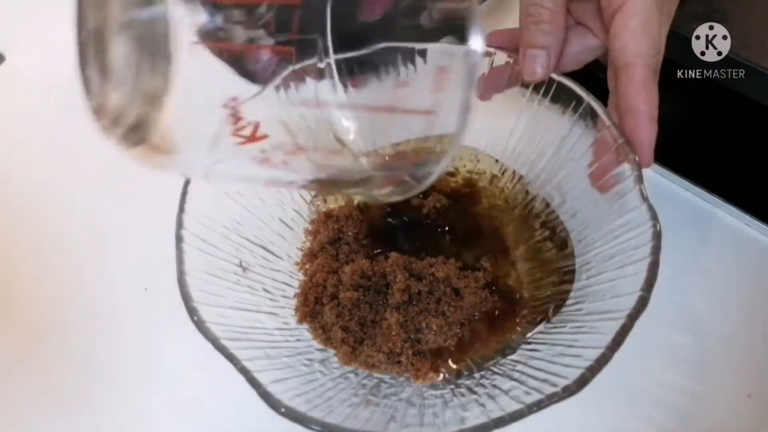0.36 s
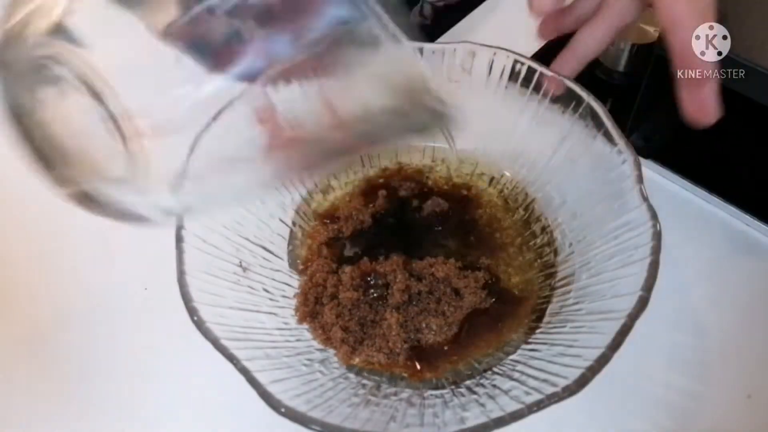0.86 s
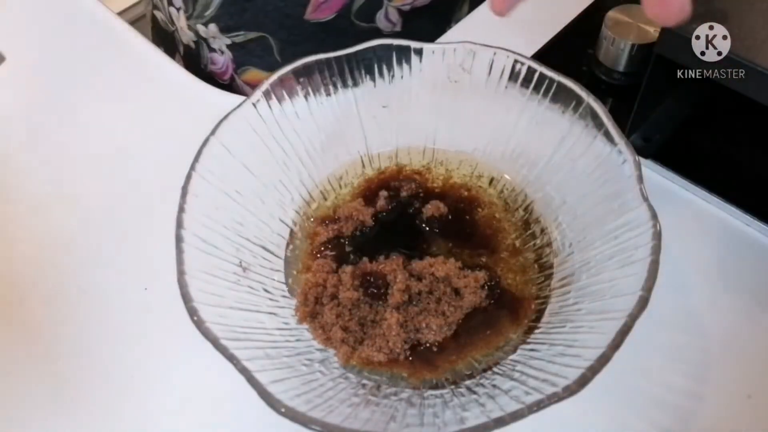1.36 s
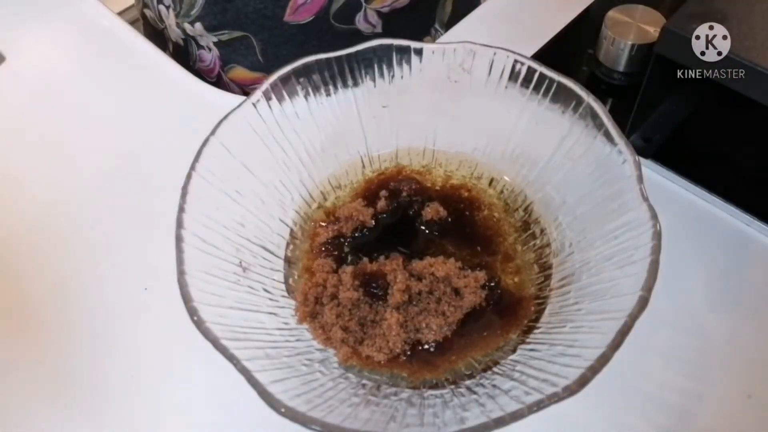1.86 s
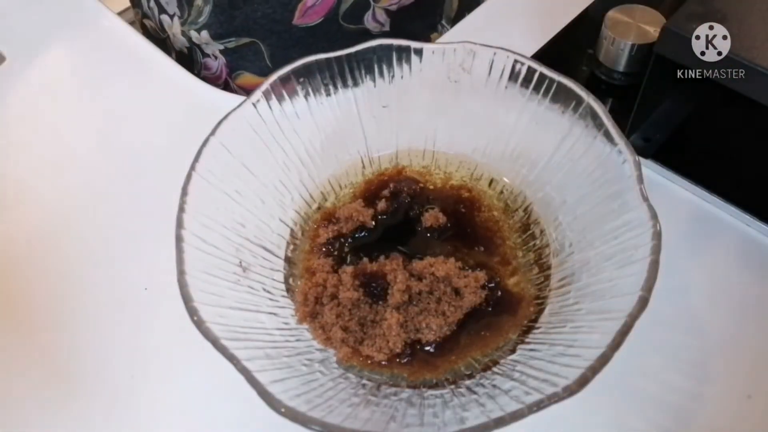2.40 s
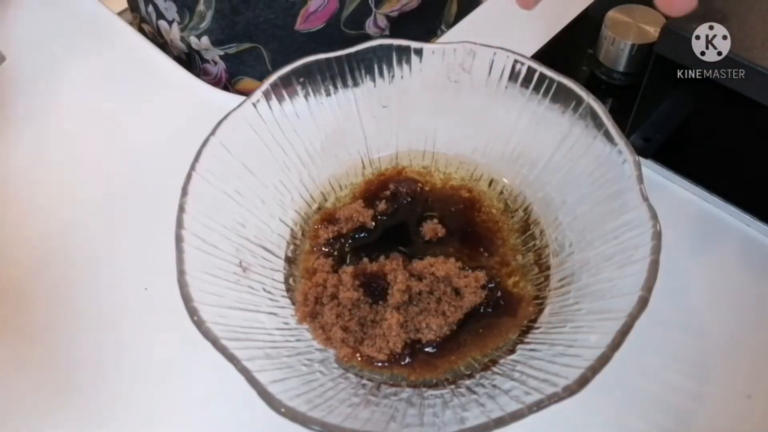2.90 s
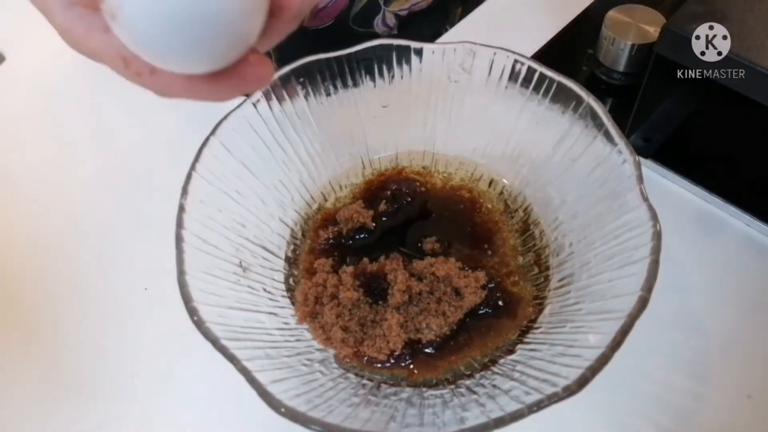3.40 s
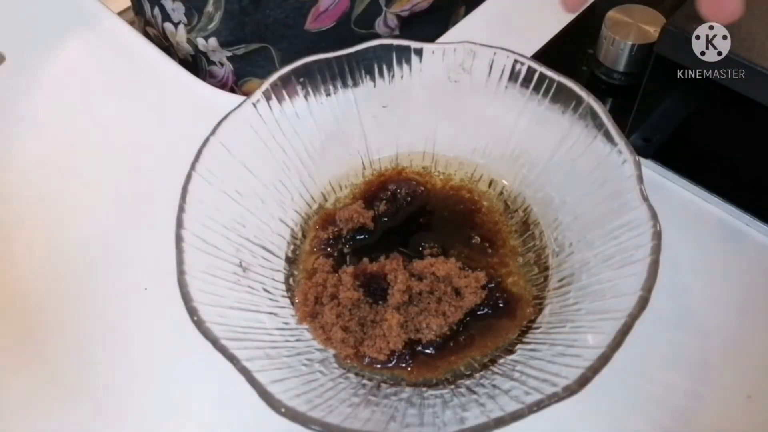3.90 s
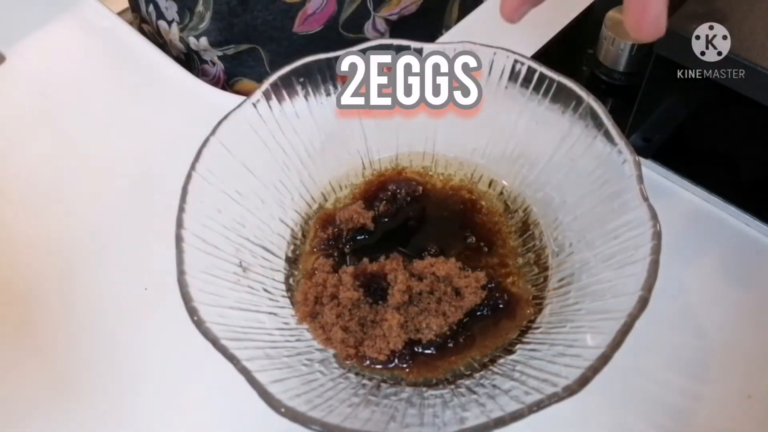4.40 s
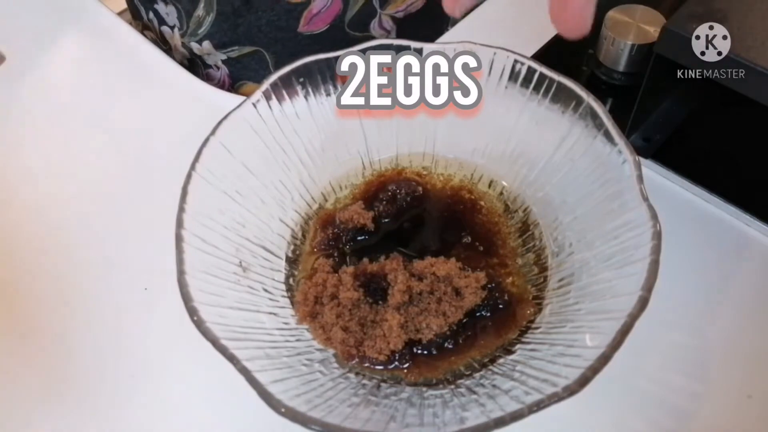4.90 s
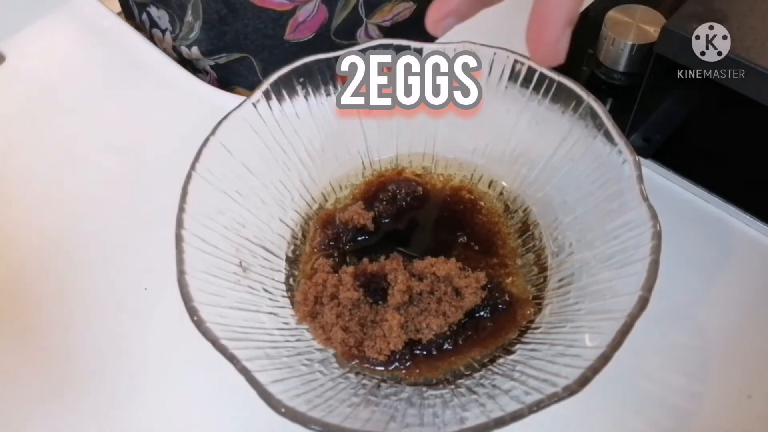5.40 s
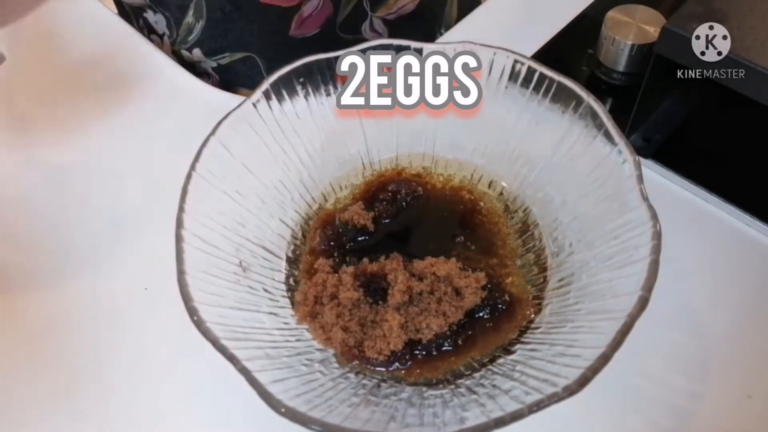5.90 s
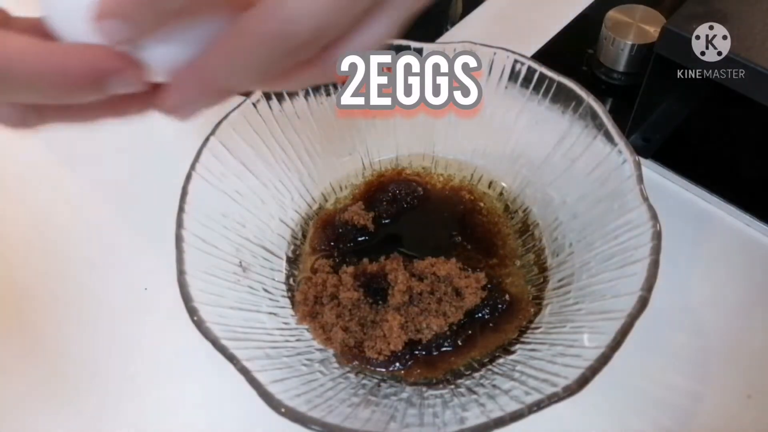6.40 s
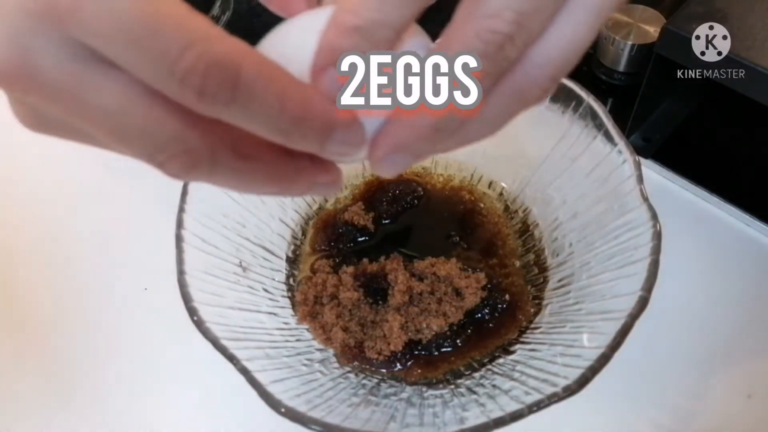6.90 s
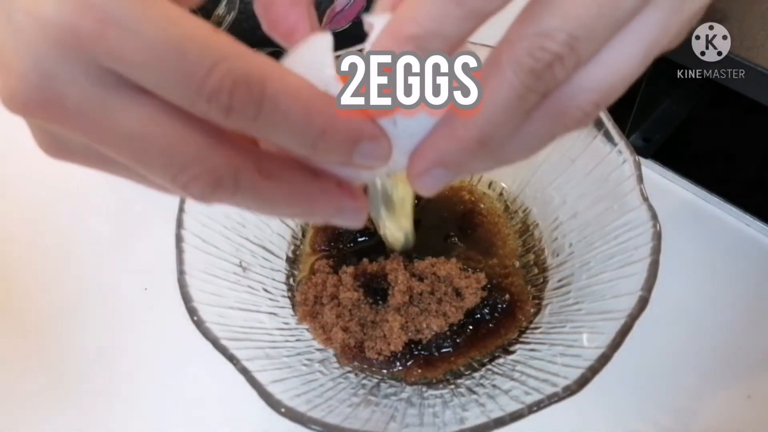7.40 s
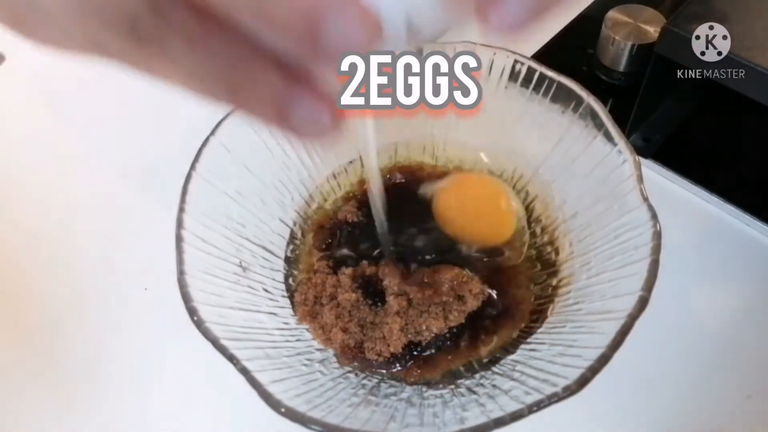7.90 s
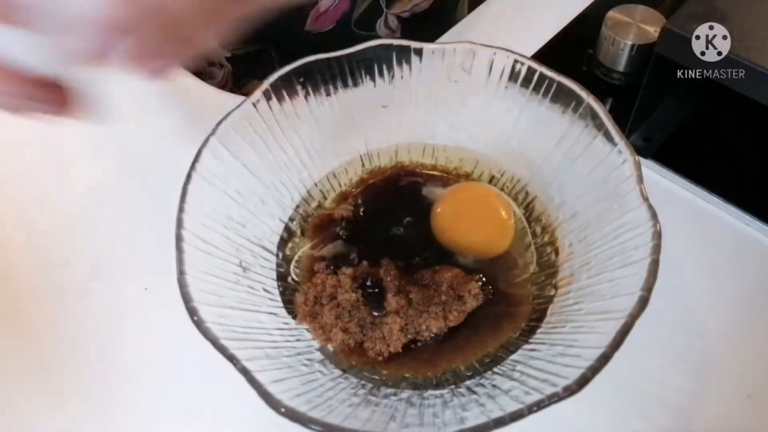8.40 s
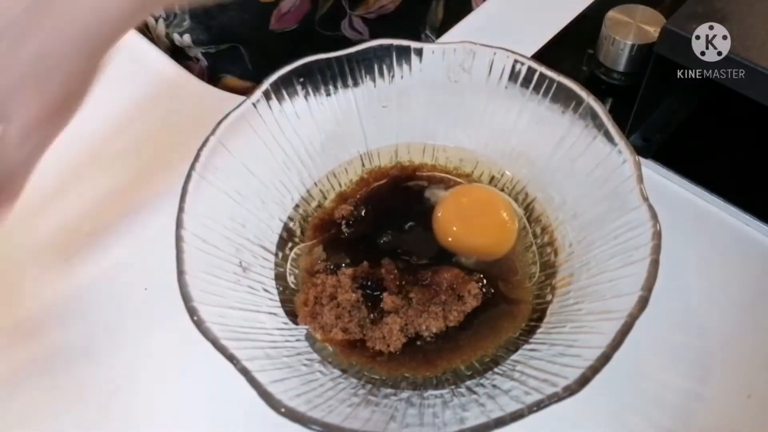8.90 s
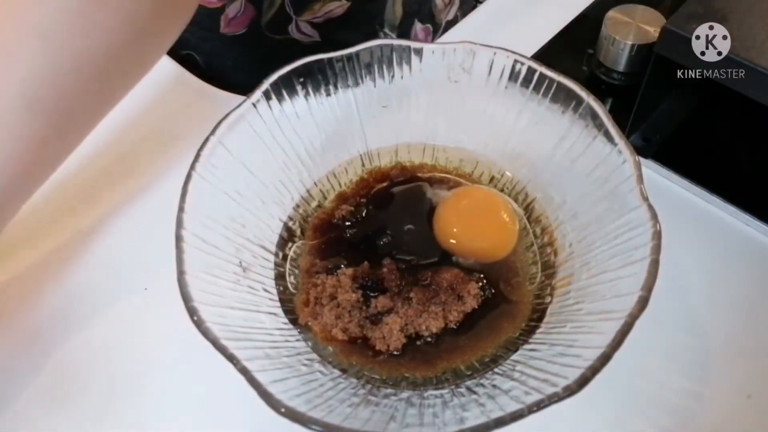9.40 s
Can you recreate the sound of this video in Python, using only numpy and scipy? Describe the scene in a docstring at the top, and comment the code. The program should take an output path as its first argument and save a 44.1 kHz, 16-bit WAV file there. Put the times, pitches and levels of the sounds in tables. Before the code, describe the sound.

A heavy jug thuds onto a counter over a low appliance hum, then an egg is tapped, crackles open, and glassware clinks sharply.

```python
"""Egg and glassware in a quiet kitchen

Heard close, through a small two-port microphone: a wavering appliance hum and fan hiss, made of shaped noise and tones.
A heavy jug is set on the counter, something knocks on wood, an egg is tapped, its shell crackles open, the halves
click together and small glassware clinks. Each blow is a noise burst plus decaying modes; fingers rub in tiny slips.
The hard room answers every blow with a short tail of noise."""
import sys
import numpy as np
from scipy import signal
from scipy.fft import irfft
from scipy.io import wavfile
from scipy.ndimage import uniform_filter1d

SR = 44100
rng = np.random.default_rng(int(sys.argv[2]) if len(sys.argv) > 2 else 0)


def output_pcm(signal):
    """Save a mono or channel-first signal as 16-bit PCM at the path in sys.argv[1].

    Samples are clipped to [-1, 1] before scaling.
    """
    pcm = np.clip(np.atleast_2d(signal).T, -1, 1) * 32767
    wavfile.write(sys.argv[1], SR, np.round(pcm).astype(np.int16))


def amplitude_ratio(level_db):
    """Convert a level in decibels to the matching linear amplitude (field) ratio."""
    exponent = np.asarray(level_db, float) / 20
    return 10 ** exponent


N = 420273  # length in samples

# Likeness of left and right port. Each row: frequency in Hz, correlation from -1 to 1.
LIKENESS = [(60, 0.87), (180, 0.91), (550, 0.94), (1650, -0.14), (4970, 0.12), (15000, -0.26)]
# Ringing of the egg shell halves. Each row: frequency in Hz, level in dB, t60 in seconds.
SHELL_MODES = [(1566, 6.5, 0.027), (1980, 0.5, 0.052), (2240, -2.5, 0.044), (2860, -4, 0.049),
               (4200, -7.5, 0.1), (5200, -7, 0.074), (5690, -5.5, 0.093), (10600, -9, 0.032)]


def evened(x):
    """Scales to rms 1."""
    return x / np.sqrt(np.mean(abs(x) ** 2) + 1e-20)


def read(points, hz):
    """Reads a spectrum table on a log-frequency axis."""
    f, value = np.transpose(points)
    return np.interp(np.log(hz + 1), np.log(f + 1), value)


def add(mix, s, sound):
    """Mixes a sound in at s seconds."""
    part = mix[round(s * SR):][:len(sound)]
    part += sound[:len(part)]


def pair(magnitude, size):
    """Two-channel noise from a bins x frames magnitude, with the tabled likeness between ports."""
    a, b, c, d = rng.standard_normal((4, *magnitude.shape))
    same = np.clip(read(LIKENESS, np.fft.rfftfreq(size, 1 / SR)), -1, 1)[:, None]
    left = a + 1j * b
    right = same * left + np.sqrt(1 - same ** 2) * (c + 1j * d)
    z = np.array([left, right])
    return signal.istft(z * magnitude, nperseg=size, noverlap=size * 3 // 4)[1]


def background(patchy_db=1.61, deep_hz=125, split_hz=1500):
    """Fan rumble and hiss, hum lines that wander like narrow noise, and mains tones of fixed pitch."""
    # Colour of the air noise. Each row: frequency in Hz, density in dB per Hz.
    air = [(15, -6.5), (35, -14.5), (68, -22), (120, -9.5), (260, -10), (334, -14.5), (479, -10),
           (521, -17.5), (935, -17), (1590, -29), (3100, -25), (4100, -33.5), (5560, -25.5), (7770, -39),
           (15600, -46)]
    air_level_db = -55.5
    # Humps in the hiss. Each row: centre in Hz, width in Hz, height in dB.
    hiss_humps = [(3240, 1670, 4.5), (5460, 890, 5.5), (3800, 290, -3)]
    # Wandering hum lines. Each row: centre in Hz, width in Hz, level in dB.
    hum_lines = [(49.2, 17, -63), (100.1, 6.5, -63), (151.6, 9.8, -64.5), (269.2, 8, -67), (312, 12, -76),
                 (474.7, 9, -70.5), (665, 16, -73), (866, 4.7, -76)]
    # Steady part of the hum. Each row: frequency in Hz, rms in dB.
    mains_tones = [(50, -62.5), (100, -60.5), (150, -68.5)]
    # Level steps down at the first egg tap, dips at the loud clink, then swells back.
    # Each row: time in seconds, level in dB.
    level_points = [(0, 0), (4.43, 0), (4.52, -10), (8.93, -10), (8.95, -22), (9.08, -17), (9.2, -11.5),
                    (9.36, -4.5), (9.53, -1)]
    # How fully each band follows that level: shares for the hiss, the rumble and the deep hum.
    follow = (.95, 1.033, 0.84)
    size = 4096
    hz, t = np.fft.rfftfreq(size, 1 / SR), np.arange(N) / SR
    frames = N * 4 // size + 5

    air_db = read(air, hz)
    for f, w, db in hiss_humps:
        air_db = air_db + db * np.exp(-((hz - f) / w) ** 2)
    power = amplitude_ratio(2 * air_db) / amplitude_ratio(2 * air_db).sum() * amplitude_ratio(2 * air_level_db)
    for f, w, db in hum_lines:
        line = np.exp(-((hz - f) / w) ** 2)
        power = power + amplitude_ratio(2 * db) * line / line.sum()

    # slow patches of louder and softer noise over time and frequency
    patches = uniform_filter1d(rng.standard_normal((frames, len(hz))), size=4, axis=0)
    patches = evened(uniform_filter1d(patches, size=30, axis=1))
    noise = pair(np.sqrt(power)[:, None] * amplitude_ratio(patchy_db * patches.T), size)[:, :N]
    noise *= np.sqrt(power.sum() / np.mean(noise ** 2))
    for f, db in mains_tones:
        noise += amplitude_ratio(db) * np.sqrt(2) * np.sin(2 * np.pi * (f * t + rng.random()))

    deep = signal.sosfiltfilt(signal.butter(2, deep_hz, fs=SR, output="sos"), noise)
    low = signal.sosfiltfilt(signal.butter(2, split_hz, fs=SR, output="sos"), noise)
    level_db = np.interp(t, *np.transpose(level_points))
    bands = (noise - low, low - deep, deep)
    return sum(band * amplitude_ratio(share * level_db) for band, share in zip(bands, follow))


def coloured(x, colour, tilt_db=0, cut_hz=1, cut_db=0):
    """Causal minimum-phase filter with the given spectrum, tilted about 1 kHz and weighted by cut_db below cut_hz."""
    hz = np.fft.rfftfreq(4096, 1 / SR) + 10
    shape_db = read(colour, hz) + tilt_db * np.log2(hz / 1000)
    shape_db -= cut_db * np.maximum(np.log2(cut_hz / hz), 0) ** 2
    log_gain = np.log(amplitude_ratio(np.maximum(shape_db, -90)))
    full = np.r_[log_gain, log_gain[-2:0:-1]]
    taps = np.fft.ifft(np.exp(np.conj(signal.hilbert(full)))).real[:2048]
    return signal.oaconvolve(x, taps / np.linalg.norm(taps))


def wander(shape, hz):
    """Slow complex chance of rms 1, up to about hz."""
    z = rng.standard_normal(shape) + 1j * rng.standard_normal(shape)
    r = np.exp(-2 * np.pi * hz / SR)
    once = signal.lfilter([1 - r], [1, -r], z)
    return evened(signal.lfilter([1 - r], [1, -r], once))


def blows(rows, modes, colour, tilt_db, dull_db, rise_ms, wet_db, focus_db, cut_db, rough, rough_hz):
    """Each blow is a burst of breaking noise and the ringing of what was struck.
    The crack tilts by tilt_db an octave, less dull_db for each ms of contact.
    Returns the crack, the same crack as one smooth pulse for the walls, and the left and right ring."""
    swell_cycles = 0.64  # a mode needs about this many cycles more to build up
    out, t = np.zeros((4, N)), np.arange(SR // 2) / SR
    crack, pulse, *sides = out
    crack_t_ms = t[:2048] * 1000
    hz, db, t60 = np.transpose(modes)[:, :, None]
    same = np.clip(read(LIKENESS, hz), 0, 1)
    for s, crack_db, ms, ring_db, spot_hz in rows:
        slope_db = tilt_db - dull_db * ms
        fade = amplitude_ratio(crack_db) * np.exp(-crack_t_ms / max(ms, .1))
        fade *= 1 - np.exp(-crack_t_ms / (0.6 * rise_ms))
        burst = fade * rng.standard_normal(2048)
        add(crack, s, coloured(burst, colour, slope_db, spot_hz, cut_db))
        click = amplitude_ratio(wet_db) * np.linalg.norm(fade, keepdims=True)  # one sample
        add(pulse, s, coloured(click, colour, slope_db, spot_hz, cut_db))

        # the spot struck weights each mode by its distance in octaves
        size = amplitude_ratio(ring_db + db - focus_db * np.log2(hz / spot_hz) ** 2 - 60 * t / t60)
        size *= 1 - np.exp(-t / (rise_ms / 1000 + swell_cycles / hz))
        for side in sides:
            # contact with hand or table makes the upper modes waver
            swing = 1 + rough * np.minimum(hz / 800, 1) * wander(size.shape, rough_hz)
            # high modes reach the ports in other phases
            swing = swing * np.exp(2j * np.pi * (1 - same) * rng.random(hz.shape))
            add(side, s, (size * swing * np.exp(2j * np.pi * hz * t)).imag.sum(0))
    return out


def glass_clinks():
    """Small glassware clinks: a bright crack and long, high modes."""
    # Each row: start in seconds, crack in dB, crack length in ms, ring in dB, favoured pitch in Hz.
    clinks = [(.185, -72, 6, -55.5, 1980), (8.938, -23, 6.4, -32.5, 4700), (9.0887, -49, 7, -43, 1900)]
    # Each row: frequency in Hz, level in dB, t60 in seconds.
    glass_modes = [(2145, -5, 0.09), (2330, -5, 0.094), (2800, -11, 0.069), (3200, -11, 0.18),
                   (3400, -4, 0.31), (3360, -6.5, 0.41), (3440, 0, 0.25), (3750, -28, .3),
                   (4474, -32, 0.22), (5140, -5, 0.15), (5800, -16, 0.37), (6500, -11, 0.32),
                   (6540, 4.5, 0.14), (6653, -9.5, 0.51), (6500, -4, 0.37), (6760, -16, 0.23),
                   (10920, -16, 0.095), (12900, -16, 0.13), (14030, -23, 0.19)]
    # Each row: frequency in Hz, crack density in dB per Hz.
    glass_colour = [(300, -36), (800, -13.5), (2000, -6.5), (3400, 4), (4800, -4.5), (6700, 2.5),
                    (8000, -9.5), (12700, -10.5), (15500, -9.5)]
    return blows(clinks, glass_modes, glass_colour, tilt_db=0.05, dull_db=0, rise_ms=2.8, wet_db=3.0,
                 focus_db=12.5, cut_db=0.54, rough=0.79, rough_hz=40.2)


def room(x, gap_ms=0.87):
    """The hard room: a noise tail of energy 1 whose bands die at their own speed."""
    # Each row: frequency in Hz, t60 in seconds.
    room_t60 = [(100, 0.34), (500, 0.33), (1500, 0.26), (4000, 0.22), (10000, 0.21)]
    hz, s = np.fft.rfftfreq(256, 1 / SR), np.arange(400) * 64 / SR
    tail = pair(amplitude_ratio(-60 * s / read(room_t60, hz)[:, None]), size=256)
    tail *= 1 - np.exp(-np.arange(tail.shape[1]) * 1000 / SR / gap_ms)
    tail /= np.linalg.norm(tail, axis=1)[:, None]
    return signal.fftconvolve(x[None], tail, axes=1)[:, :N]


def jug_thuds():
    """A heavy jug set down: dull contact noise and the counter's low modes."""
    # Each row: start in seconds, crack in dB, crack length in ms, ring in dB, favoured pitch in Hz.
    thuds = [(1.948, -23.5, 6.4, -25.5, 590), (2.026, -18.5, 6.9, -21, 177), (2.263, -40.5, 24, -29.5, 170),
             (2.27, -34.5, 25, -37, 810), (2.308, -41.5, 13.7, -29, 170)]
    # Each row: frequency in Hz, level in dB, t60 in seconds.
    counter_modes = [(44.4, -2.5, 0.49), (85, -13, 0.26), (106.6, -12, 0.21), (152.6, 1, 0.18),
                     (169.6, 2, 0.31), (201, -3.5, 0.19), (257, -4, 0.14), (315, -3, 0.23),
                     (393, -6.5, 0.14), (487, -8, 0.22), (619, 1, 0.14), (671, -4, 0.21), (787, -9.5, 0.21),
                     (810, -2, 0.094), (958, -15, 0.063), (1285, 0, 0.074), (1393, -6, 0.053),
                     (1700, -18, .1), (2360, 0, 0.044), (2700, -5.5, 0.087)]
    # Each row: frequency in Hz, crack density in dB per Hz.
    thud_colour = [(60, -1), (150, 4), (400, -6.5), (950, -2.5), (1500, -11.5), (3000, -17.5), (4600, -22),
                   (5700, -12), (7300, -25.5), (15500, -29)]
    return blows(thuds, counter_modes, thud_colour, tilt_db=3.5, dull_db=0.44, rise_ms=2.94, wet_db=5.0,
                 focus_db=4.0, cut_db=1.0, rough=0.65, rough_hz=25.6)


def rubbing(grains_per_s=6000, spread_db=6.0):
    """Fingers on shell and glass: dense tiny slips; each stroke swells quickly and fades more slowly."""
    # Each row: strongest slip in seconds, level in dB, length in seconds.
    strokes = [(2.32, -58, 0.13), (2.466, -66.5, 0.1), (6.8, -77, .3), (7.183, -68.5, 0.11),
               (8.214, -64, 0.11), (8.303, -67, .12), (9.264, -66, 0.091), (9.453, -73, 0.17)]
    # Each row: frequency in Hz, density in dB per Hz.
    slip_colour = [(3000, -17), (6000, -1), (10000, 0), (15500, -4)]
    rise_share, depth_db = 0.37, 24  # share of a stroke spent swelling; how far below the top it starts and ends
    t, gain = np.arange(N) / SR, np.zeros(N)
    for s, db, length in strokes:
        away = np.maximum((s - t) / (rise_share * length), (t - s) / ((1 - rise_share) * length))
        gain += amplitude_ratio(db - depth_db * away)
    slips = (rng.random((2, N)) < grains_per_s / SR) * rng.standard_normal((2, N))
    slips *= amplitude_ratio(spread_db * np.minimum(rng.exponential(1, (2, N)), 4))
    return gain * np.array([evened(coloured(x, slip_colour)[:N]) for x in slips])


def wood_knocks():
    """A knock on wood: a short crack and quickly damped modes."""
    # Each row: start in seconds, crack in dB, crack length in ms, ring in dB, favoured pitch in Hz.
    knocks = [(4.155, -24.5, 2.4, -35.5, 500)]
    # Each row: frequency in Hz, level in dB, t60 in seconds.
    wood_modes = [(208, -7.5, 0.14), (257.4, 0, 0.13), (356, -3, 0.2), (482, 2, 0.14), (529, -2, 0.14),
                  (670, -3, 0.15), (830, -4, 0.14), (1533, 1.5, 0.018), (2120, -12, 0.022)]
    # Each row: frequency in Hz, crack density in dB per Hz.
    wood_colour = [(150, -23), (350, 2), (800, 3), (1500, -21), (2400, -7), (3500, -21), (4500, -30),
                   (15500, -52.5)]
    return blows(knocks, wood_modes, wood_colour, tilt_db=-1.0, dull_db=0.5, rise_ms=1.65, wet_db=0.0,
                 focus_db=-1.8, cut_db=1.0, rough=0.7, rough_hz=39.7)


def egg_taps():
    """Taps on the egg: a sharp crack and very short shell modes over a few lower, longer ones."""
    # Each row: start in seconds, crack in dB, crack length in ms, ring in dB, favoured pitch in Hz.
    taps = [(4.438, -21.5, 1.45, -40, 2000), (5.11, -50, 4.3, -61, 2650), (5.476, -29, 3.1, -38, 1500)]
    # Each row: frequency in Hz, level in dB, t60 in seconds.
    egg_modes = [(500, -6, 0.23), (709, -10.5, 0.17), (936, 1, 0.027), (1520, 0, 0.024),
                 (2330, 10.5, 0.018), (2870, -9, 0.01), (5950, -9, .012)]
    # Each row: frequency in Hz, crack density in dB per Hz.
    egg_colour = [(120, -22), (250, -4), (600, -8), (1100, -2), (1800, -9.5), (2650, -7), (4200, -15),
                  (5800, -6), (7800, -19.5), (15500, -21)]
    return blows(taps, egg_modes, egg_colour, tilt_db=-1.7, dull_db=-1.04, rise_ms=0.5, wet_db=-1.5,
                 focus_db=0.5, cut_db=0.5, rough=0.94, rough_hz=152)


def shell_crackle():
    """The shell crackles open in ticks whose settings are all alike but for size."""
    # Each row: start in seconds, crack in dB.
    ticks = [(6.1045, -54), (6.5124, -58), (6.686, -56), (6.732, -53), (6.7605, -56), (6.795, -50.5),
             (6.8289, -52), (6.87, -41), (6.9294, -56), (7.022, -49.5), (7.169, -54), (7.1894, -50)]
    # Each row: frequency in Hz, crack density in dB per Hz.
    tick_colour = [(2000, -33), (4000, -1.5), (6000, 9), (10000, 2), (15500, -9)]
    crack_ms, ring_under_crack_db, favoured_hz = 1.1, -24, 5500
    rows = [(s, db, crack_ms, db + ring_under_crack_db, favoured_hz) for s, db in ticks]
    return blows(rows, SHELL_MODES, tick_colour, tilt_db=-1.0, dull_db=-0.5, rise_ms=0.82, wet_db=-3.5,
                 focus_db=3.0, cut_db=2.0, rough=0.55, rough_hz=150)


def half_clicks():
    """The shell halves click together, ringing mostly near the pitch of the spot struck."""
    # Each row: start in seconds, crack in dB, ring in dB, favoured pitch in Hz.
    clicks = [(7.364, -58, -56, 1410), (7.8535, -66, -63.5, 1570), (8.1334, -63, -67, 2020),
              (8.1682, -58, -54, 2020), (8.215, -50, -51.5, 1800), (8.2294, -46, -51.5, 5800),
              (8.295, -38.5, -44, 4930), (8.371, -47, -56, 1630), (8.4094, -74, -71, 1500),
              (8.5483, -68, -67, 1760)]
    # Each row: frequency in Hz, crack density in dB per Hz.
    half_colour = [(470, -79), (800, -57), (1450, -7), (3630, -15.5), (5540, -6), (6750, -18), (10000, -20),
                   (15500, -29)]
    crack_ms = 2.4
    rows = [(s, db, crack_ms, ring_db, hz) for s, db, ring_db, hz in clicks]
    return blows(rows, SHELL_MODES, half_colour, tilt_db=0.0, dull_db=-0.5, rise_ms=0.29, wet_db=-5.5,
                 focus_db=21.0, cut_db=-1.5, rough=0.97, rough_hz=122)


def jar_knocks():
    """Knocks on a jar: a crack strongest near 3 kHz and modes from low body to thin ring."""
    # Each row: start in seconds, crack in dB, crack length in ms, ring in dB, favoured pitch in Hz.
    knocks = [(9.223, -63, 3.4, -44.5, 340), (9.239, -37, 3.7, -43, 2830), (9.279, -45.5, 5.1, -47.5, 360),
              (9.337, -38.5, 0.91, -46, 2970), (9.519, -48, 4.2, -59.5, 2710)]
    # Each row: frequency in Hz, level in dB, t60 in seconds.
    jar_modes = [(285, -7.5, 0.22), (356, -3.5, 0.31), (615, -13, 0.12), (973, -6, 0.2), (1215, -12, 0.069),
                 (2100, -14.5, 0.19), (2490, -10, 0.088), (2670, -9, 0.077), (2770, -9, 0.088),
                 (2940, 1, 0.1), (3230, -3.5, 0.071), (6697, -21, 0.14)]
    # Each row: frequency in Hz, crack density in dB per Hz.
    jar_colour = [(250, -17.5), (1000, -6.5), (1700, -30), (2300, -2.5), (2900, 10.5), (3400, 1),
                  (4000, -16), (6700, -7.5), (8000, -31), (12000, -17.5), (15500, -8)]
    return blows(knocks, jar_modes, jar_colour, tilt_db=-0.1, dull_db=0, rise_ms=0.98, wet_db=6.5,
                 focus_db=5.0, cut_db=-0.5, rough=1.13, rough_hz=149)


def scene():
    """All blows, their room tail, the rubbing and the background."""
    glassware = glass_clinks() + jar_knocks()
    egg = egg_taps() + shell_crackle() + half_clicks()
    cracks, pulses, *rings = jug_thuds() + wood_knocks() + egg + glassware
    wet = room(pulses + amplitude_ratio(-6.5) * rings[1])
    return cracks + rings + wet + rubbing() + background()


def band_limit(x):
    """A steep low-pass at the top of the band."""
    return signal.sosfilt(signal.butter(12, 16520, fs=SR, output="sos"), x)


def record(dry):
    """The two microphone ports colour the sound differently and hear it a little apart."""
    # The right port is louder over most of the range, most of all near 5.7 kHz.
    # Each row: frequency in Hz, left minus right in dB.
    port_lean = [(60, -3.5), (200, -8), (500, -3.5), (1000, -2), (2400, -2.5), (3500, -6), (4500, -6),
                 (5700, -15.5), (7000, -3.5), (8500, 7), (15000, -3.5)]
    left_lag, top_hz = 13, 15500  # left port hears later, in samples; upper edge
    hz = np.fft.rfftfreq(512, 1 / SR)
    lean = amplitude_ratio(read(port_lean, hz))
    gain = np.array([lean, np.ones_like(lean)]) * np.sqrt(2 / (1 + lean ** 2))
    gain *= amplitude_ratio(-24.0 * (hz > top_hz))
    taps = np.roll(irfft(gain), 256, axis=1) * np.hanning(512)
    taps[0] = np.roll(taps[0], left_lag)
    ports = signal.oaconvolve(dry, taps, axes=1)[:, 256:256 + N]
    return band_limit(ports)


dry = scene()
out = record(dry)
output_pcm(out)
```